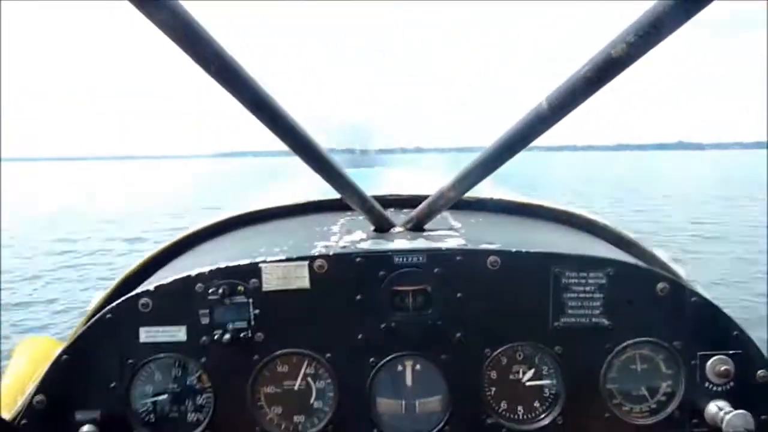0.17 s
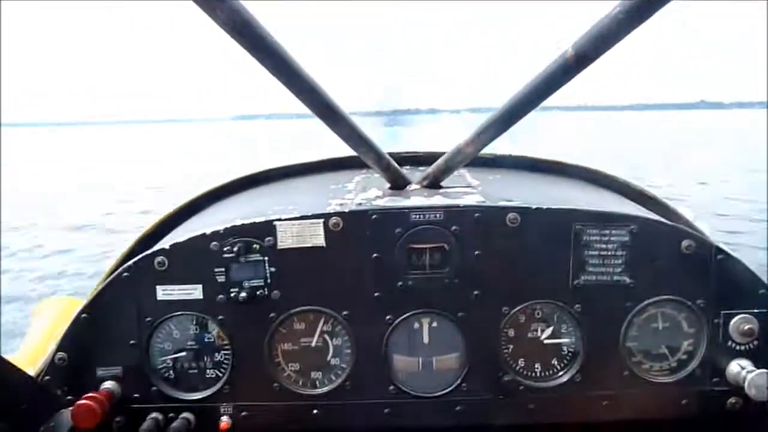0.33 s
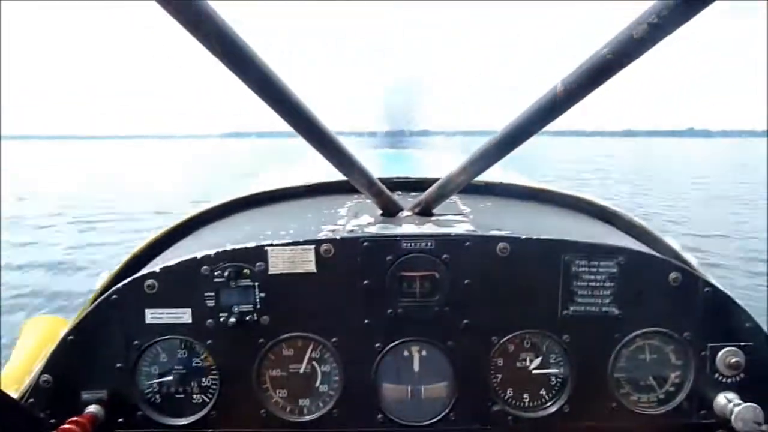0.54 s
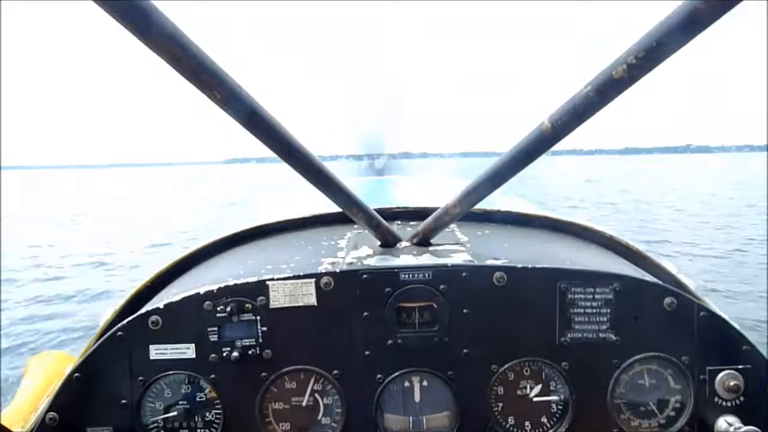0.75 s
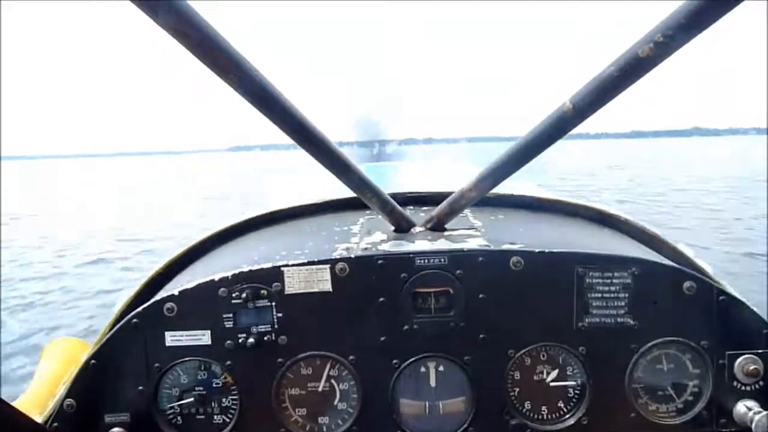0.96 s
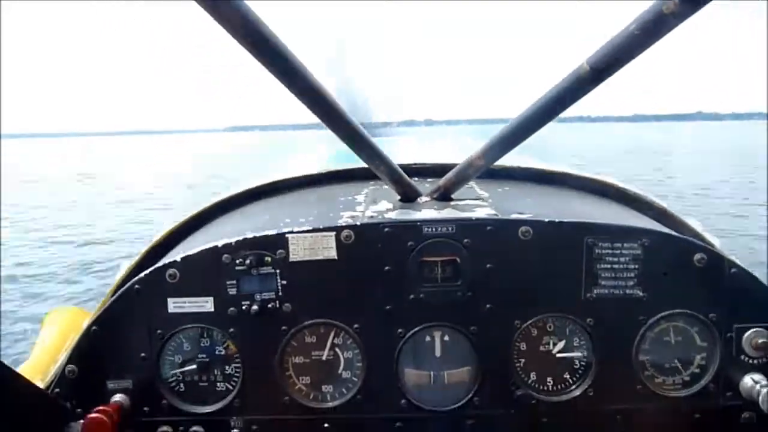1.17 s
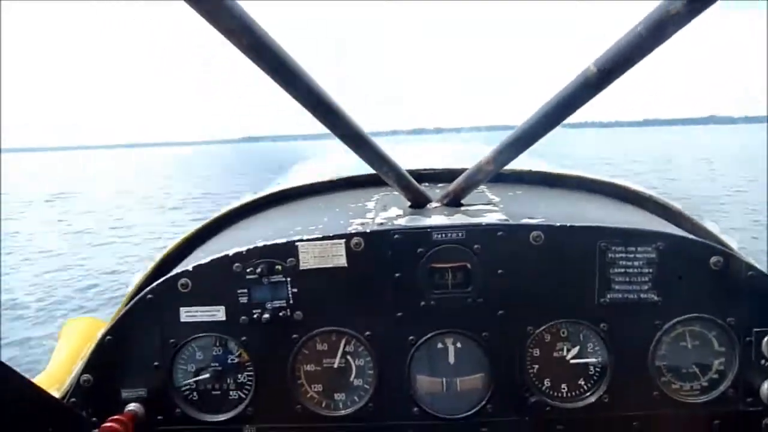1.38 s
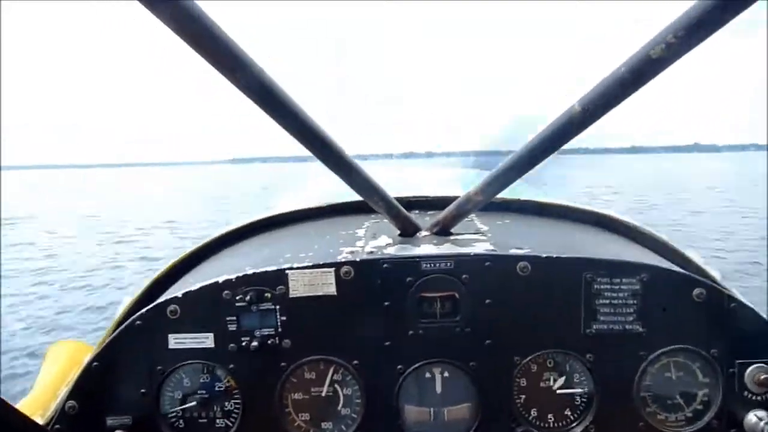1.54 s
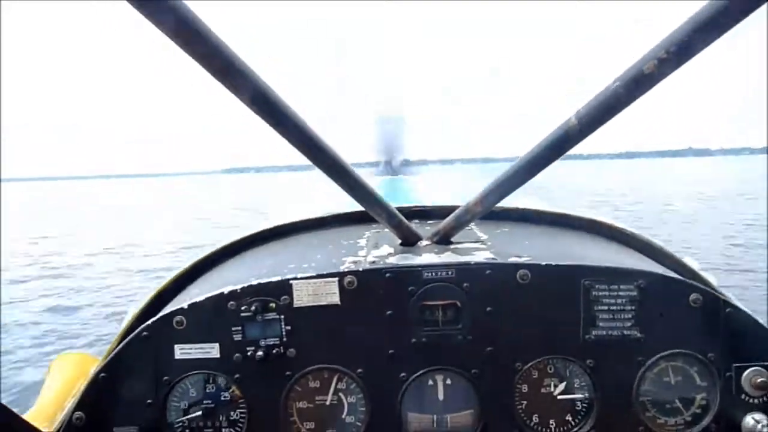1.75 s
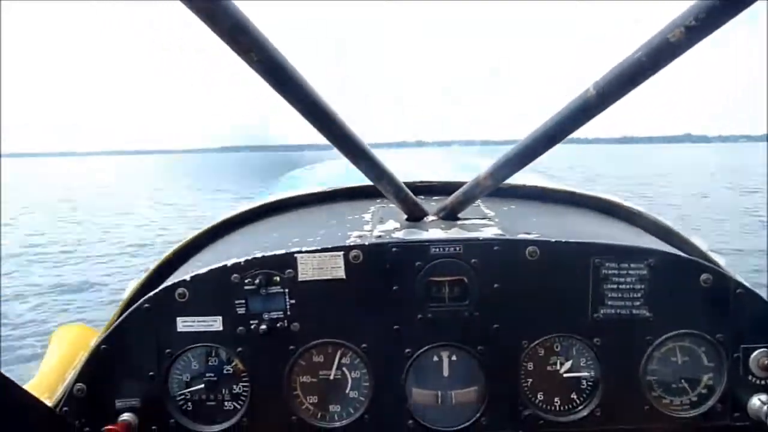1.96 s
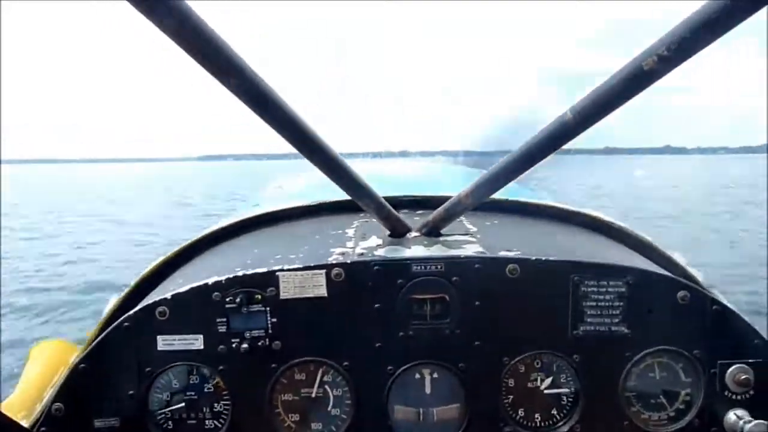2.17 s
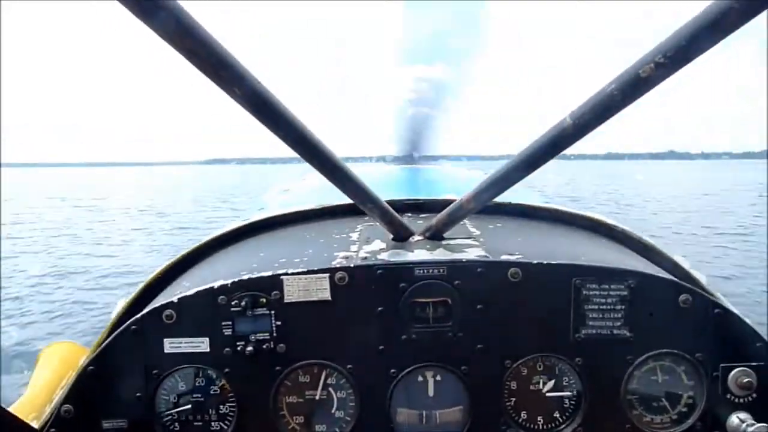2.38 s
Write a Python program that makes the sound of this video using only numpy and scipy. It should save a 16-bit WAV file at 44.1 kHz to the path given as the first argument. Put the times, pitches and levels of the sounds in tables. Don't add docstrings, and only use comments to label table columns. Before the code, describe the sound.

Small propeller floatplane engine roars steadily in the cabin as waves slap and spray rushes past

```python
import sys
import numpy as np
from scipy import signal
from scipy.fft import rfft, irfft, next_fast_len
from scipy.io import wavfile
from scipy.ndimage import uniform_filter1d, map_coordinates

SR = 44100
rng = np.random.default_rng(int(sys.argv[2]) if len(sys.argv) > 2 else 0)


def put_to_file(sound):
    columns = np.atleast_2d(sound).T
    safe = np.clip(columns, -1, 1)
    whole_steps = np.round(safe * 32767)
    wavfile.write(sys.argv[1], SR, whole_steps.astype(np.int16))


def natural_amplitude(level_db):
    exponent = np.asarray(level_db, float) / 20
    return 10 ** exponent


N = 110691

# [f/Hz, level/dB]
HISS_SPECTRUM = [(3000, -120), (4500, 0.5), (7400, -2.5), (7800, -9), (8200, -28), (8400, -50)]
# [f/Hz, rms level/dB]
WHINES = [(4389, -79), (6223, -90), (6666, -87)]
# [t/s, peak level/dB, f/Hz, length/s]
HEAVES = [(0.036, -16.5, 73, 0.084), (0.105, -16.5, 82, 0.034), (0.174, -16.5, 83, 0.048),
          (0.2, -29, 88, 0.02), (0.239, -23, 61, 0.025), (0.358, -18.5, 77.5, 0.032),
          (0.383, -10, 77, 0.014), (0.505, -24, 78, 0.068), (0.576, -13.5, 84.6, 0.037),
          (0.616, -27, 68, 0.017), (0.683, -14, 83, 0.03), (0.732, -12.5, 78, 0.019),
          (0.792, -21, 85, 0.032), (1.045, -19.9, 81, 0.013), (1.072, -14.5, 70, 0.015),
          (1.104, -21, 77.4, 0.012), (1.342, -17, 63, 0.035), (1.442, -12, 82, 0.022),
          (1.472, -10.5, 75.6, 0.034), (1.661, -18, 80, 0.023), (1.714, -13, 77, 0.047),
          (1.772, -14.5, 75, 0.028), (1.797, -24.5, 76.5, 0.013), (1.828, -22, 64, 0.019),
          (1.907, -8, 74, 0.018), (1.971, -17.5, 75, 0.038), (2.027, -18, 70, 0.047),
          (2.14, -15.5, 79, 0.013), (2.169, -12.5, 74, 0.023), (2.38, -19.5, 82.4, 0.041)]
# [t/s, peak level/dB, f/Hz, length/s]
KNOCKS = [(0.014, -32, 256, 0.045), (0.044, -20, 274, 0.017), (0.151, -14.5, 270, 0.022),
          (0.18, -11, 310, 0.0093), (0.344, -17, 313, 0.019), (0.366, -19, 330, 0.012),
          (0.409, -21, 296, 0.024), (0.434, -13.5, 347, 0.007), (0.46, -19, 273.5, 0.039),
          (0.565, -31, 284, 0.02), (0.603, -19, 291, 0.02), (0.672, -19.5, 293, 0.016),
          (0.717, -17.5, 325, 0.018), (0.753, -14.5, 262, 0.014), (0.775, -18, 292, 0.01),
          (0.844, -22, 263, 0.019), (0.878, -20.7, 296, 0.014), (0.917, -21, 344, 0.02),
          (0.961, -13.5, 273, 0.026), (1.078, -8.5, 295, 0.013), (1.106, -12, 278, 0.01),
          (1.329, -23.5, 280, 0.018), (1.481, -14.5, 270, 0.022), (1.633, -15, 290, 0.011),
          (1.659, -8, 270, 0.0067), (1.676, -39, 305, 0.008), (1.72, -17.5, 294, 0.008),
          (1.755, -19, 325, 0.012), (1.821, -16.5, 315, 0.023), (1.84, -30, 276, 0.013),
          (1.866, -18, 299, 0.0064), (1.885, -33, 293, 0.014), (1.909, -20, 278, 0.042),
          (2.021, -15, 300, 0.0064), (2.135, -15, 330, 0.0098), (2.161, -15, 287, 0.025),
          (2.185, -13.5, 284, 0.0087), (2.307, -18, 277, 0.023), (2.365, -27, 290, 0.0065),
          (2.402, -19.5, 310, 0.032)]
# [t/s, peak level/dB, f/Hz, length/s]
BUFFETS = [(0.02, -14.5, 136.6, 0.022), (0.048, -9.5, 156, 0.013), (0.096, -11, 145, 0.0098),
           (0.136, -10, 159, 0.014), (0.168, -8, 172, 0.0069), (0.202, -11.5, 173, 0.021),
           (0.258, -13, 165, 0.031), (0.308, -16, 153, 0.01), (0.364, -13, 147, 0.02),
           (0.391, -15, 140, 0.016), (0.419, -15.5, 145, 0.02), (0.458, -12.5, 164, 0.033),
           (0.502, -11.5, 151, 0.022), (0.554, -7, 153, 0.016), (0.581, -14, 156, 0.0099),
           (0.613, -10.5, 165, 0.028), (0.687, -10, 164, 0.01), (0.734, -28, 150, 0.0085),
           (0.762, -18.5, 158, 0.065), (0.812, -16.5, 172, 0.0087), (0.84, -15.5, 182, 0.038),
           (0.886, -18.5, 149, 0.028), (0.952, -17, 162, 0.021), (0.973, -12, 149, 0.009),
           (0.993, -18.5, 164, 0.0075), (1.016, -13.5, 162, 0.019), (1.074, -8.5, 169, 0.0075),
           (1.106, -12.5, 150, 0.037), (1.229, -11, 158, 0.0082), (1.387, -15.5, 147, 0.026),
           (1.447, -16, 138, 0.015), (1.489, -9, 157, 0.015), (1.603, -16, 139, 0.042),
           (1.635, -18, 148, 0.036), (1.733, -15.5, 157, 0.013), (1.763, -17, 173, 0.02),
           (1.807, -13, 170, 0.012), (1.881, -7.5, 154.6, 0.0066), (1.923, -16.5, 154, 0.06),
           (1.962, -14.5, 161, 0.018), (2.004, -16.5, 161, 0.039), (2.172, -12.5, 146, 0.013),
           (2.214, -16.6, 173, 0.02), (2.288, -14.5, 128, 0.029), (2.317, -15.5, 177, 0.012),
           (2.386, -12.5, 173, 0.018), (2.426, -15.5, 145, 0.015), (2.472, -13, 163, 0.026)]
# [t/s, level/dB]
SPRAY_STRENGTH = [(0.0, -27), (0.25, -31), (0.33, -29), (0.81, -28.5), (0.82, -26.5), (1.05, -29),
                  (1.07, -25), (1.12, -32), (1.46, -26.5), (1.54, -34), (1.6, -28.5), (1.89, -26.5),
                  (1.97, -34.5), (2.01, -29.5), (2.11, -34), (2.15, -23), (2.19, -32), (2.51, -27.5)]
# [f/Hz, level/dB]
RUSH_SPECTRUM = [(450, -30), (900, -0.5), (1370, -3.5), (1740, -3), (3200, -10.5), (3600, -13), (4400, -44),
                 (5400, -57.5)]
# [f/Hz, width/Hz, level/dB]
PANEL_MODES = [(249.3, 49.6, -3), (339, 57, -4), (407, 23.6, -5.5), (481.6, 29, -7), (562, 37, -4.5),
               (652, 47, -9.5), (747, 60, -6.5), (883, 44, -7.5), (953.4, 18.6, -10), (1143, 350, -19),
               (1747, 177, -20.5)]
# [t/s, splash peak level/dB]
SLAPS = [(0.145, -13.5), (0.274, -32), (0.298, -49), (0.43, -10), (0.498, -10), (0.593, -11.5),
         (0.663, -15), (0.82, -14.5), (0.91, -8.5), (0.952, -12.5), (1.065, -7), (1.278, -16.5),
         (1.41, -27), (1.425, -18), (1.459, -10.5), (1.585, -14.5), (1.633, -22.5), (1.716, -13.5),
         (1.739, -18), (1.802, -14), (1.853, -30), (1.994, -14.5), (2.035, -15.5), (2.06, -26),
         (2.123, -14), (2.248, -33), (2.264, -12), (2.34, -11.5), (2.475, -10.5)]
# [f/Hz, level/dB]
HULL_MUFFLE = [(1500, -7.5), (3000, -2), (4500, -36.5)]
# [f/Hz, level/dB]
RUMBLE_SPECTRUM = [(20, -15), (45, 2.5), (58, 4.5), (68, 7), (77, 1.5), (88, 8.5), (102, 0.5), (130, -34.5)]
# [f/Hz, level/dB]
CABIN_AIR = [(80, -38.5), (105, -5), (130, 0.5), (160, -21.5), (195, -0.5), (215, -15), (400, -71)]
# [t/s, level/dB]
BOOM_STRENGTH = [(0.0, -26.5), (0.04, -25.5), (0.31, -21), (0.33, -26.5), (0.36, -24.5), (1.12, -20),
                 (1.15, -23.5), (1.5, -23), (1.55, -22.5), (1.61, -25), (1.72, -21), (1.73, -21),
                 (2.0, -23.5), (2.11, -21), (2.17, -17), (2.23, -26.5), (2.48, -29.5), (2.51, -13)]
# [t/s, second firing order f/Hz, tone clearness level/dB]
ENGINE_SPEED = [
    (0, 166, -7),
    (.25, 164, -8),
    (.5, 163, -14.5),
    (.8, 165, 2.5),
    (1.1, 166, -8),
    (1.35, 164, 0),
    (1.6, 164, -5),
    (2, 165, -10),
    (2.51, 167, 1),
]
# [multiple of the second firing order, level over the boom/dB]
ENGINE_ORDERS = [(.5, -14), (1, -8)]


def unit(x):
    return x / np.sqrt(np.mean(x ** 2) + 1e-20)


def along(points, hz):
    f, level = np.transpose(points)
    return np.interp(np.log(hz + 1), np.log(f + 1), level)


def curves(rows):
    s, *columns = np.transpose(rows)
    return [np.interp(np.arange(N) / SR, s, column) for column in columns]


def wobble(rate):
    return map_coordinates(rng.standard_normal(400), [np.arange(N) * rate / SR])


def filtered(x, response):
    m = next_fast_len(N + SR // 2)
    return irfft(rfft(x, m) * response(np.fft.rfftfreq(m, 1 / SR)), m)[:N]


def shaped(x, points):
    return filtered(x, lambda f: natural_amplitude(along(points, f)))


def evened(x):
    steady, window_s = 0.8, 0.035
    power = np.abs(uniform_filter1d(unit(x) ** 2, round(window_s * SR))) + 0.037
    return unit(x / power ** (steady / 2))


def patchy(patchy_db):
    z = signal.stft(rng.standard_normal(N + 512), nperseg=512)[2]
    field = uniform_filter1d(rng.standard_normal(z.shape), size=6, axis=0)
    field = uniform_filter1d(field, size=8, axis=1)
    return signal.istft(z * natural_amplitude(patchy_db * unit(field)), nperseg=512)[1][:N]


def panels(f):
    total = 0
    for k, (centre, width, db) in enumerate(PANEL_MODES):
        resonance = 1j * f * width / (centre * centre - f * f + 1j * f * width)
        total = total + (-1) ** k * natural_amplitude(db) * resonance
    return total


def electronics():
    t = np.arange(N) / SR
    sound = natural_amplitude(-67) * unit(shaped(rng.standard_normal(N), HISS_SPECTRUM))
    for hz, db in WHINES:
        sound += natural_amplitude(db) * np.sqrt(2) * np.sin(2 * np.pi * hz * t)
    return sound


def swells(rows, gain_db, stretch, phases):
    t, sound = np.arange(N) / SR, np.zeros(N)
    for (s, db, hz, length), phase in zip(rows, phases):
        bell = np.exp(-np.log(16) * ((t - s) / (stretch * length)) ** 2)
        sound += natural_amplitude(db + gain_db) * bell * np.sin(2 * np.pi * hz * (t - s) + phase)
    return sound


def airframe():
    step_scatter = 0.12
    turns = np.cumsum(curves(ENGINE_SPEED)[0]) / SR
    chance = rng.uniform(0, 2 * np.pi, size=(3, 60))
    in_step = [2 * np.pi * turns[round(row[0] * SR)] + 2 * step_scatter * (u - np.pi)
               for row, u in zip(BUFFETS, chance[2])]
    heaves = swells(HEAVES, gain_db=-6.5, stretch=1, phases=chance[0])
    knocks = swells(KNOCKS, gain_db=-5.5, stretch=0.79, phases=chance[1])
    return heaves + knocks + swells(BUFFETS, gain_db=-3.5, stretch=1.056, phases=in_step)


def spray():
    drum_db, drum_follows = 1, 1.06
    rush_db, rush_follows = -5, 0.86
    strength_db, = curves(SPRAY_STRENGTH)
    mean_db = strength_db.mean()
    swing_db = strength_db - mean_db + 0.7 * wobble(34.09)
    lumps = natural_amplitude(0.6 * wobble(39.7))
    drum = evened(filtered(patchy(patchy_db=1.17) * lumps, panels))
    rush = unit(shaped(patchy(patchy_db=0.77), RUSH_SPECTRUM))
    drum = natural_amplitude(drum_db + drum_follows * swing_db) * drum
    rush = natural_amplitude(rush_db + rush_follows * swing_db) * rush
    return natural_amplitude(mean_db) * (drum + rush)


def slaps():
    splash_db, splash_t60_s, splash_rise_s = -16, 0.18, 0.0013
    crack_db, crack_t60_s = -3.5, 0.057
    click_db = 2
    t = np.arange(SR // 4) / SR
    splash = natural_amplitude(splash_db - 60 * t / splash_t60_s) * (1 - np.exp(-t / splash_rise_s))
    fade = splash + natural_amplitude(crack_db - 60 * t / crack_t60_s)
    envelope, blows = np.zeros(N + SR), np.zeros(N)
    for s, db in SLAPS:
        start = round(s * SR)
        envelope[start:][:len(t)] += natural_amplitude(db) * fade
        blows[start] = natural_amplitude(db + click_db)
    water = envelope[:N] * evened(filtered(rng.standard_normal(N), panels))
    return shaped(filtered(blows, panels) + water, HULL_MUFFLE)


def engine():
    rumble_db, rumble_follows = -9.5, 0.3
    wash_db, firing_db = -7, -14
    jitter, firing_scatter_db = 0.11, 1.5
    (hz, clear_db), (boom_db,) = curves(ENGINE_SPEED), curves(BOOM_STRENGTH)
    turns = np.cumsum(hz) / SR

    tones = np.zeros(N)
    for multiple, db in ENGINE_ORDERS:
        level = natural_amplitude(db + clear_db + 0.52 * wobble(18))
        phase = 2 * np.pi * multiple * turns + 0.3 * wobble(6.8)
        tones += level * np.sqrt(2) * np.sin(phase)

    chance = rng.standard_normal((300, 2))
    at = np.flatnonzero(np.diff(np.floor(turns / 2)))
    late = (jitter * chance[:len(at), 0] * 2 * SR / hz[at]).astype(int)
    strength = natural_amplitude(firing_scatter_db * chance[:len(at), 1])
    firings = np.bincount(np.clip(at + late, 0, N - 1), strength, N)
    firings = evened(shaped(firings, CABIN_AIR))

    lumps = natural_amplitude(0.8 * wobble(34.43))
    wash = unit(lumps * evened(shaped(rng.standard_normal(N), CABIN_AIR)))
    boom = natural_amplitude(boom_db) * (tones + natural_amplitude(wash_db) * wash + natural_amplitude(firing_db) * firings)

    rumble = evened(shaped(rng.standard_normal(N), RUMBLE_SPECTRUM))
    mean_db = boom_db.mean()
    return boom + natural_amplitude(mean_db + rumble_db + rumble_follows * (boom_db - mean_db)) * rumble


def scene():
    return (airframe() + spray() + slaps() + engine())[None]


def low_pass(x):
    return signal.sosfilt(signal.butter(12, 8250, fs=SR, output="sos"), x)


def record(dry):
    ceiling, knee, offset = 0.44, 5, -0.0108
    held = dry[0] / (1 + np.abs(dry[0] / ceiling) ** knee) ** (1 / knee)
    dull = shaped(held, [(4500, 1.0), (6000, -34.5), (8000, -54)])
    return low_pass((dull + electronics() + offset)[None])


dry = scene()
out = record(dry)
put_to_file(out)
```